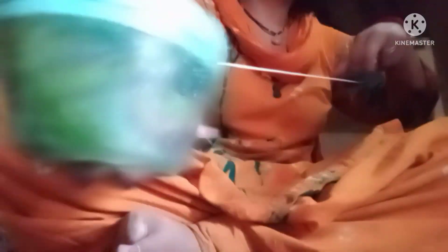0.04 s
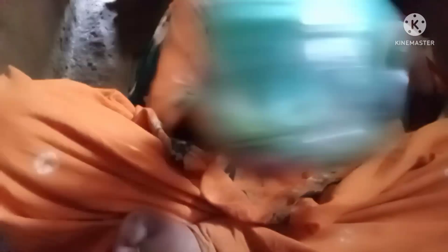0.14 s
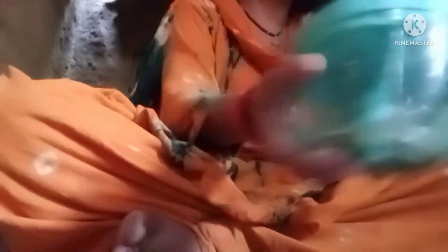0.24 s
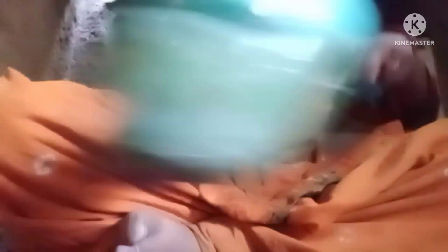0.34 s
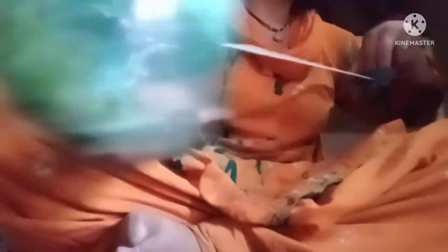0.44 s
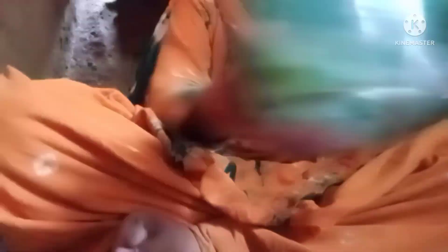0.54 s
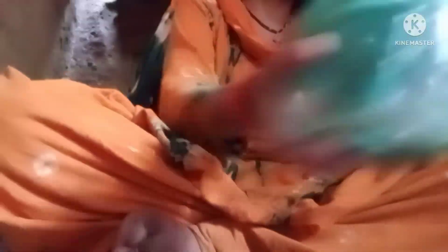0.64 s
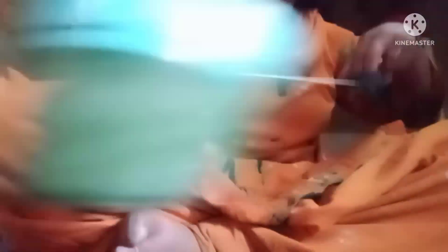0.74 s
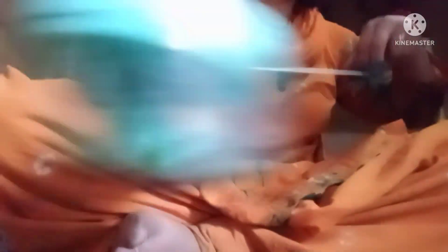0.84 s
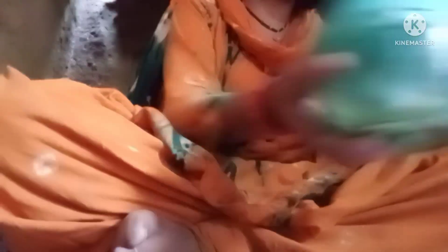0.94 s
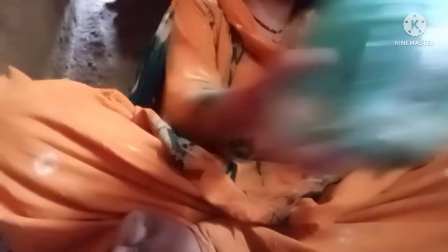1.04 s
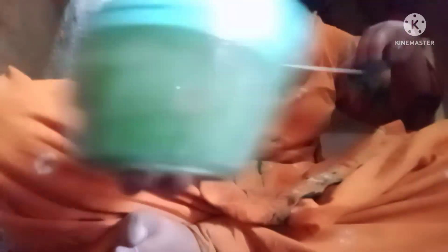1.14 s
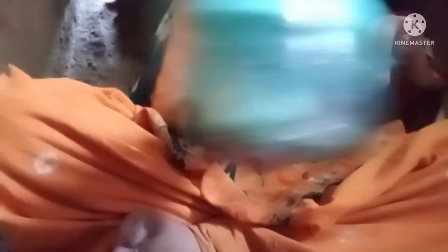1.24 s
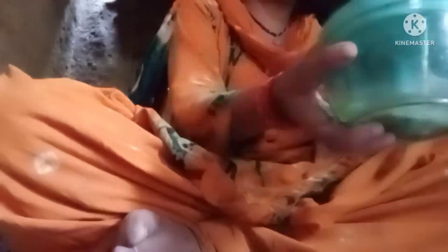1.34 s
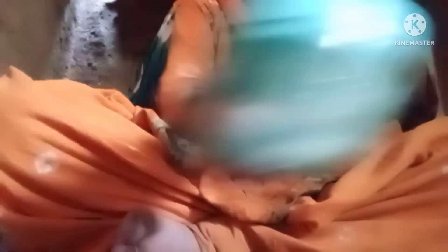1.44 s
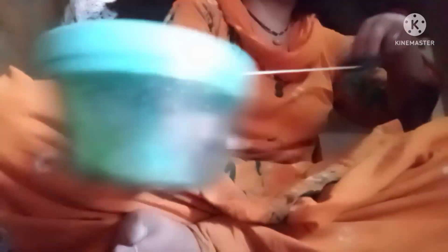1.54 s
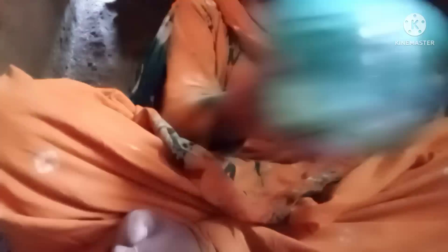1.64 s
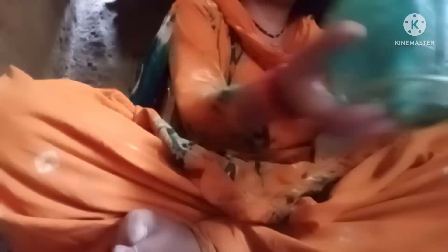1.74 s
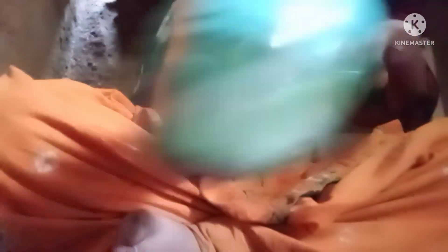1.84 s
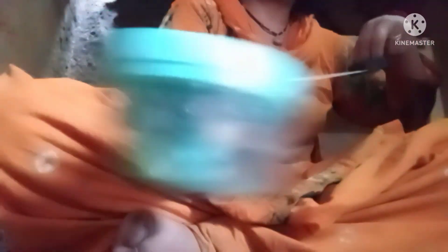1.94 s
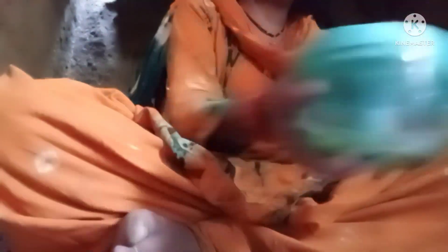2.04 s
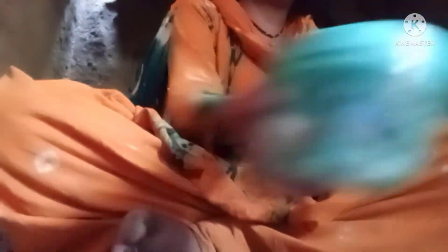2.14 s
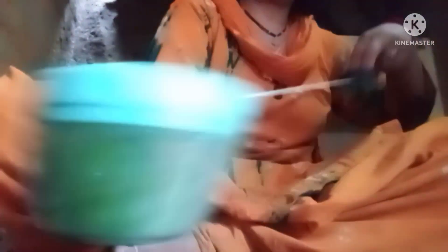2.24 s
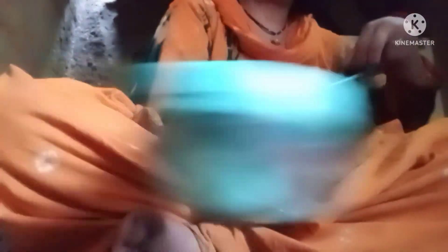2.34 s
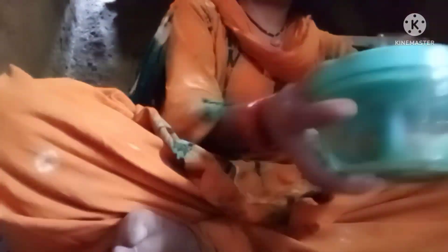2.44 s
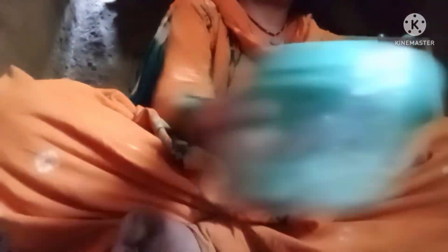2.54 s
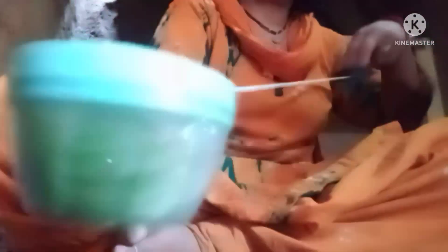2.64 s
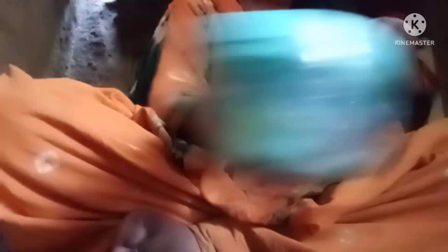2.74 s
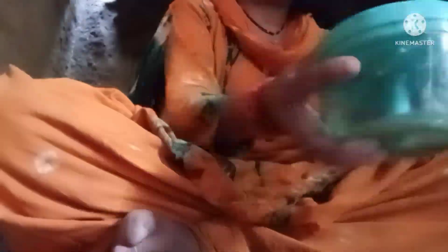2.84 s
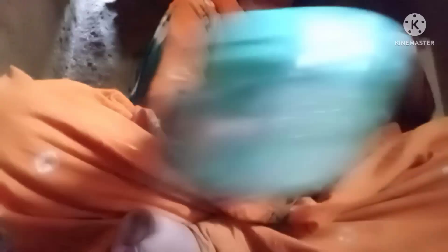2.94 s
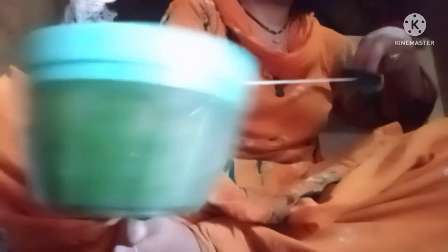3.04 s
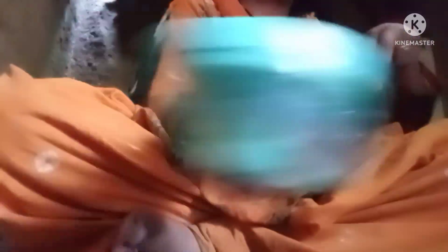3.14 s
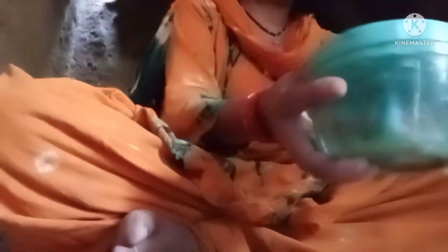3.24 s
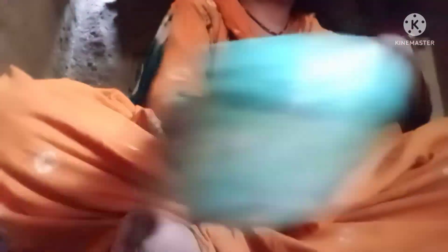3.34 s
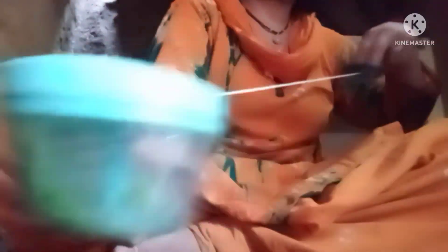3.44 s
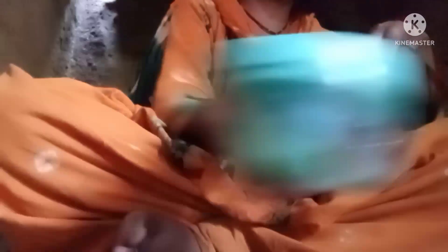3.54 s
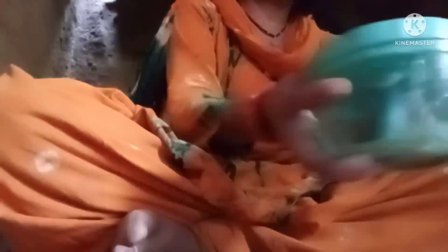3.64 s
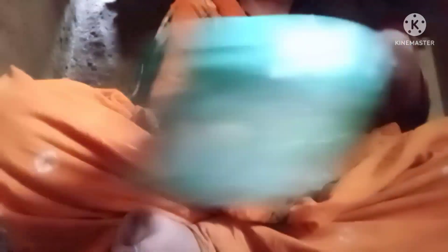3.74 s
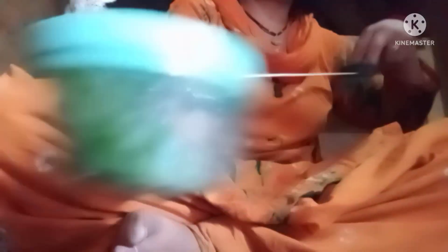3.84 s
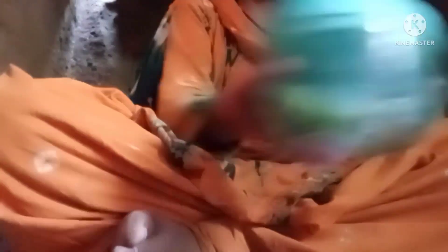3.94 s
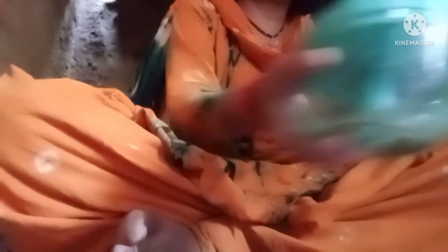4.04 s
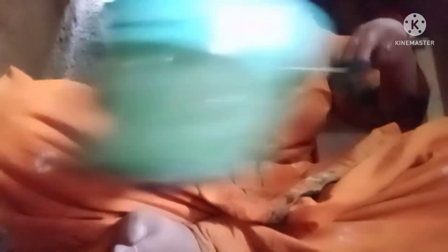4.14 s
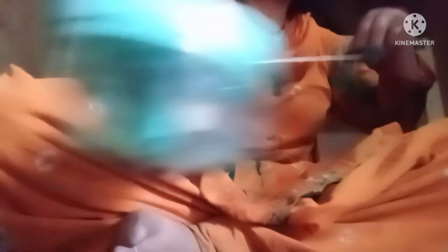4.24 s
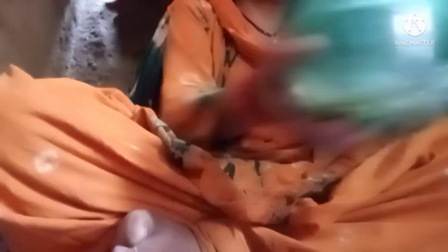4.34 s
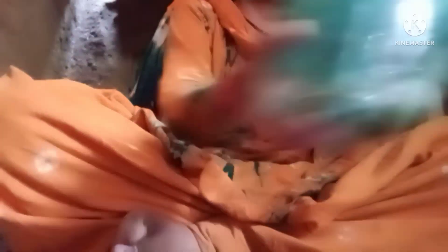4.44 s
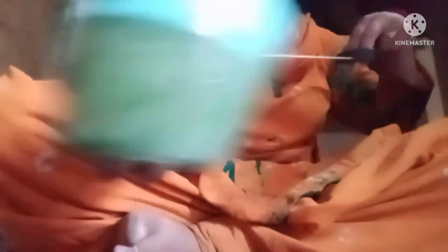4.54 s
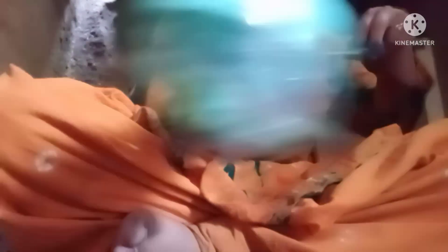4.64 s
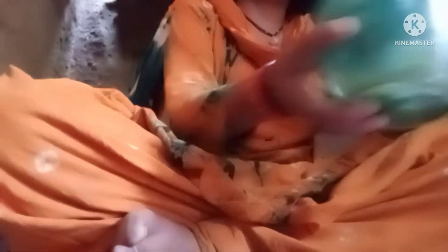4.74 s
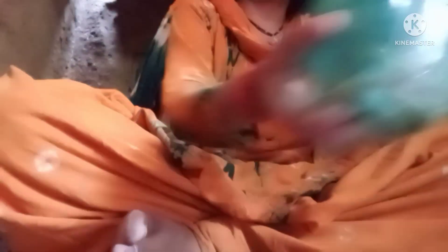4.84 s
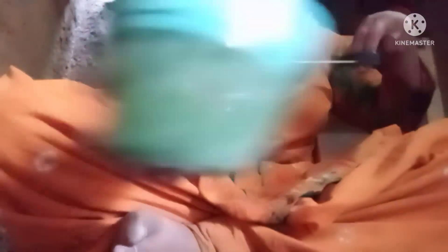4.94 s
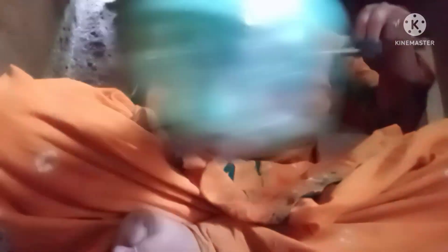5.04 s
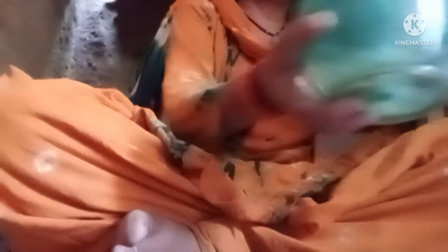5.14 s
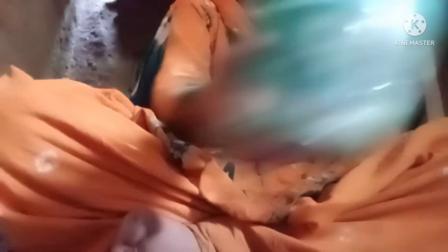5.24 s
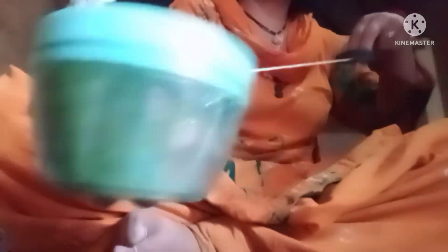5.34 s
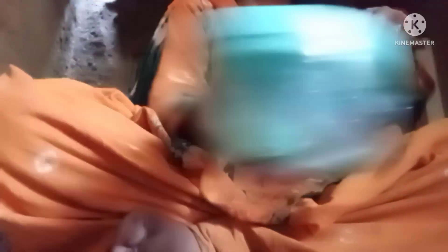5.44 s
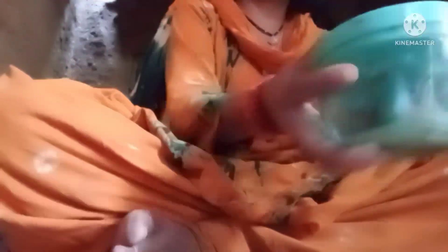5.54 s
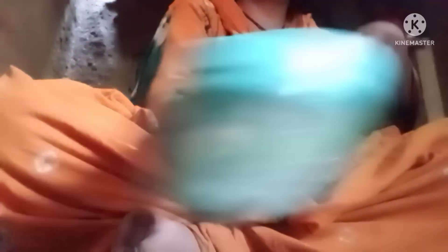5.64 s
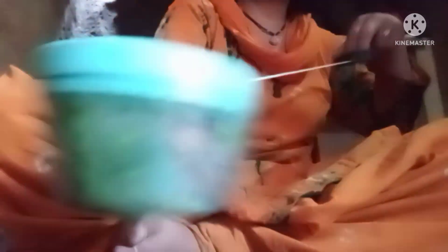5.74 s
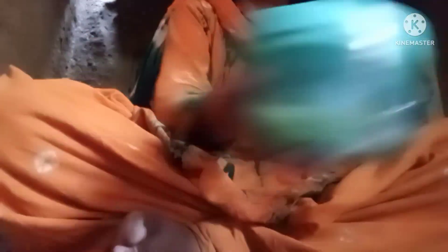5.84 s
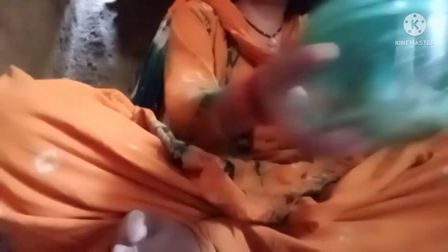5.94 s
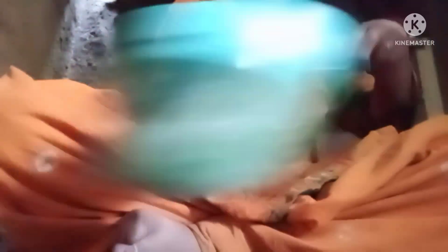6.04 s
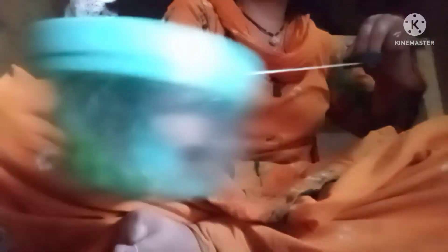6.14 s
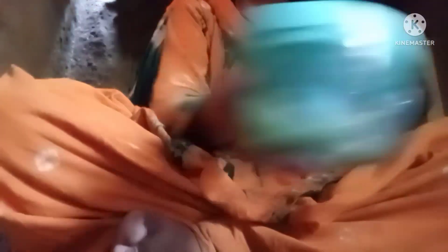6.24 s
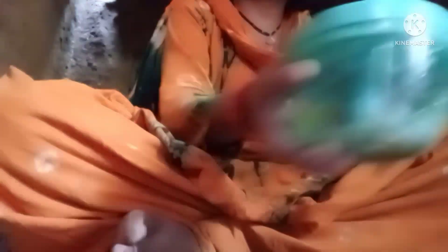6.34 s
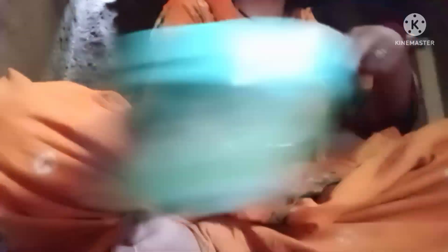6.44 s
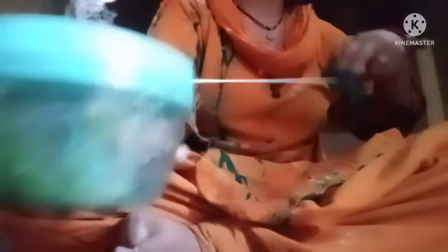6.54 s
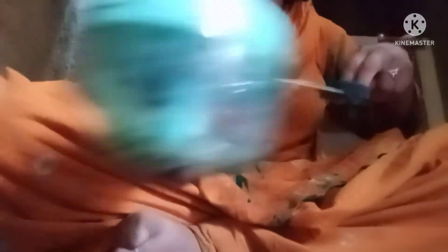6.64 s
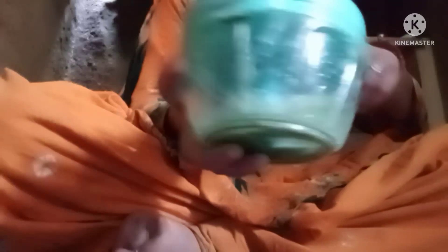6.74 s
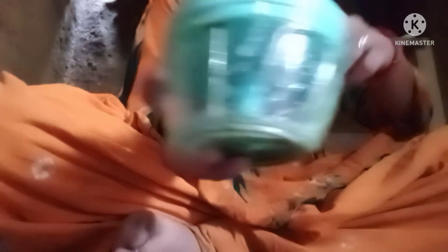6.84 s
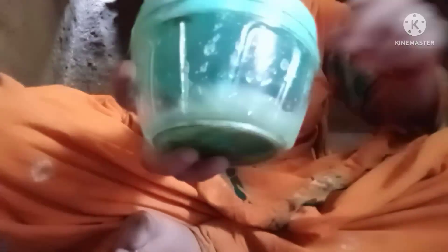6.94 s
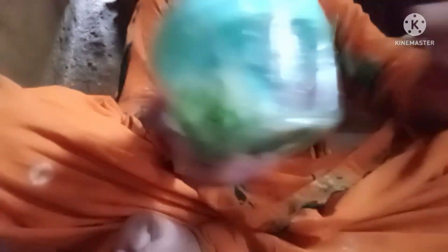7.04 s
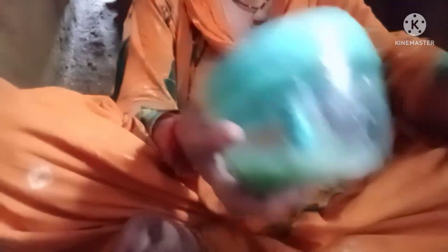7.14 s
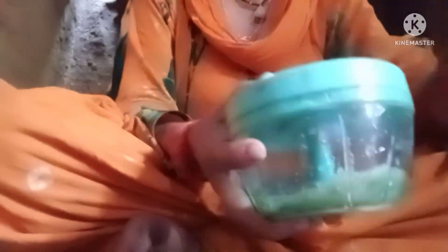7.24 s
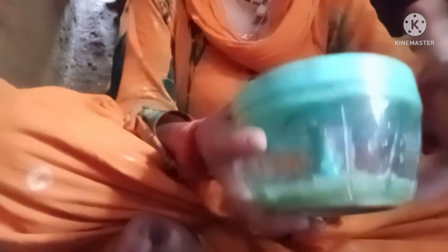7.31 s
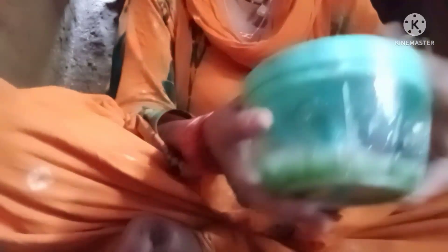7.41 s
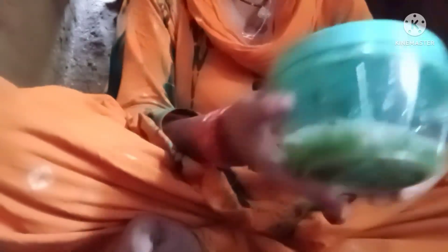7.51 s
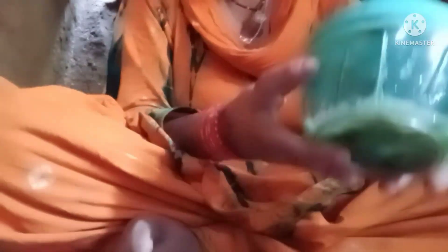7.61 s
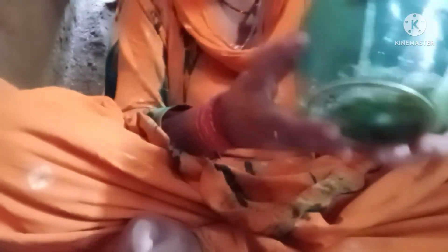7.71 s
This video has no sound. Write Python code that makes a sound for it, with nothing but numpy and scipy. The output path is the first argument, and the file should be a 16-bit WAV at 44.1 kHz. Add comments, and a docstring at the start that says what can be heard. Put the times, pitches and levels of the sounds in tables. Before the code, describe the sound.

From 0 to about 6.7 seconds a hand-pull chopper works loudly, very close, in a small room. Eighteen pulls come roughly every 0.38 seconds. Each lasts about 0.2 seconds: a gritty, bright cord hiss with a midrange whirr of blades ticking through wet leaves, swelling early and fading. At release a hollow shaft knock is followed within hundredths of a second by a sharp pawl catch and skipping clicks, then a rattling ratchet rewind with wet slosh. Leaf clumps thud irregularly against the plastic wall, and the hollow jar tone keeps wavering. Handle clacks hit the lid near 2.7, 4.65 and 6.2 seconds. The last pull is slower, and around 6.64 to 6.76 seconds the handle lands in a quick run of plastic clacks. Short reflections die away; only faint room air remains, with a very soft, dull hand bump near 7.6 seconds.

```python
"""Pull-cord chopper, close up

A hand-held chopper is pulled eighteen times in a small room, close to the microphone. On each pull the cord
hisses (gritty pulse train) and blades whirr through wet leaves (ticks and noise in a drifting resonance).
At releases the shaft knocks, the pawl catches and skips (filtered taps), and the ratchet clatters on rewind.
The handle clacks on the lid (cracks and decaying modes), and at the end it clacks home.
Sparse near reflections, a soft bump in the hand and faint room air (filtered noise) lie behind."""
import sys
import numpy as np
from scipy import signal
from scipy.fft import rfft, irfft
from scipy.io import wavfile
from scipy.ndimage import uniform_filter1d, minimum_filter1d

SR = 44100
rng = np.random.default_rng(int(sys.argv[2]) if len(sys.argv) > 2 else 0)


def wav_out(sig):
    """Save sig, one row per channel (or a flat mono array), as 16-bit PCM at SR to the path in sys.argv[1]."""
    wavfile.write(sys.argv[1], SR, np.round(np.clip(np.atleast_2d(sig).T, -1, 1) * 32767).astype(np.int16))


N = 342831
T = np.arange(N) / SR  # t/s

# Strokes: [release t/s, release knock level/dB, length of the pull before it t/s, wait until the pawl catches t/s,
# catch level/dB, share of crack in the pawl level/dB, rewind clatter level/dB]; levels before the layer offsets
STROKES = [(0.1219, -13, .183, 0.024, -8, -15, -15.5), (0.5082, -13, .195, 0.031, -8, -17.5, -16),
           (0.8879, -11.5, .19, 0.027, -8, -11, -19), (1.26, -15.5, .179, 0.029, -8.5, -11.5, -16),
           (1.6381, -9, .194, 0.026, -12.5, -8, -16.5), (2.0150, -11.5, .193, 0.029, -8.5, -10, -16),
           (2.392, -26.5, .189, .0363, -11, -8, -15.5), (2.7755, -11.5, .198, 0.041, -14, -7, -15),
           (3.1494, -9.5, .191, 0.039, -13, -9, -15), (3.5438, -10.5, .203, .0247, -7.5, -11, -18),
           (3.9215, -8.5, .191, 0.026, -9, -8.5, -16.5), (4.3039, -10, .186, .0263, -5.5, -8.5, -16.5),
           (4.690, -24.5, .199, .039, -21, -8, -14), (5.063, -17, .187, .0315, -8.5, -16, -16.5),
           (5.4377, -9, .18, .0215, -10.5, -14.5, -16.5), (5.821, -22.5, .189, .0456, -19, -14.5, -16),
           (6.2326, -14.5, .211, .0340, -11.5, -11, -19)]
# The last pull, slower, after which the handle is let go: [end t/s, length t/s]
LAST_PULL = (6.68, .228)
# Course of a pull: [share of its length, whirr relative level/dB, cord hiss relative level/dB]
PULL_COURSE = [(-.06, -24, -33.5), (0, -10.5, -13), (.1, -5, -2.5), (.3, 1, 2), (.44, -1, 1),
               (.58, -3.5, -4), (.77, -10, -15.5), (1, -32, -27)]
# Course of a rewind: [share of its length, clatter relative level/dB]
REWIND_COURSE = [(-.03, 4), (0, -3.5), (.08, -8.5), (.2, -0.5), (.37, 3.5), (.58, 0), (.74, 0),
                 (.87, -25.5), (1, -20)]
# Clumps of leaves slammed against the wall: [t/s, level/dB before the body and crack offsets, share of crack level/dB]
THUDS = [(.1883, -7.5, -9), (.3768, -7, -15), (.5926, -8.5, -11), (.6657, -11.5, -15), (1.1269, -14, -29),
         (1.495, -11, -15), (2.4681, -8, -14.5), (2.634, -7.5, -17.5), (2.9294, -10.5, -28),
         (3.0821, -10.5, -21), (3.4006, -7.5, -19.5), (3.8428, -9.5, -15), (4.03, -3, -22),
         (4.4214, -11.5, -25.5), (5.0315, -14, -20), (5.2091, -6.5, -16.5), (5.5149, -13, -17.5),
         (5.911, -9, -18.5), (6.0782, -6, -20), (6.3188, -10, -17.5)]
# The handle strikes the lid: [t/s, level/dB before the crack and ring offsets]
HANDLE_STRIKES = [(2.729, -14.5), (4.6476, -13), (5.819, -27), (6.1842, -9.5), (6.6416, -8.5),
                  (6.6637, -14.5), (6.685, -15), (6.709, -15), (6.755, -15)]

# Colours of the jar under blades, ratchet and hard blows: [f/Hz, relative level per Hz/dB]
WHIRR_COLOUR = [(30, -46.5), (70, -20.5), (150, -8), (300, -4.5), (600, -1.5), (950, -1.5), (1300, -5),
                (1700, -10.5), (2300, -14), (3200, -14), (3800, -27), (4400, -36.5), (5200, -51.5),
                (15000, -69.5)]
CLATTER_COLOUR = [(30, -42), (60, -24.5), (100, -15.5), (160, -4), (300, -2), (800, 0), (1150, -3.5),
                  (1700, -11.5), (2500, -21), (3300, -19), (4000, -37), (4800, -54.5), (11000, -49.5),
                  (15500, -63.5)]
KNOCK_COLOUR = [(50, -31.5), (150, -16), (400, -0.5), (900, 3.5), (1500, -7.5), (2500, -9.5), (3400, -17.5),
                (4100, -26), (4900, -52.5), (8500, -50), (12000, -49.5), (15500, -64.5)]
# Colour of the cord in its eyelet: [f/Hz, relative level per Hz/dB]
CORD_COLOUR = [(2500, -34.5), (4200, -4), (5200, -8.5), (6600, -7.5), (7800, 2), (9000, 3), (10000, -5.5),
               (11200, 2), (12400, 0.5), (13400, -12), (14500, -11.5), (15700, -8.5)]
# Resonances of jar and lid: [f/Hz, width f/Hz, lift level/dB]
JAR_RESONANCES = [(264, 25, 6.5), (401.3, 101, 8), (695, 55, 1), (826, 50, 4), (1980, 100, 5),
                  (2785, 74, 3.5)]
# Colour of handle and lid: [f/Hz, relative level per Hz/dB]
HANDLE_COLOUR = [(50, -29.5), (150, -16.5), (400, -1.5), (750, 0), (1100, 3.5), (1600, -5), (2400, -7),
                 (3050, -8), (3550, -6.5), (4100, -22), (4900, -41.5), (8500, -36.5), (12000, -40),
                 (15500, -52)]
# Modes of the lid: [f/Hz, relative level/dB, t60 t/s]
LID_MODES = [(1060, -7.5, 0.076), (1120, -9.5, 0.072), (1960, -10, .08), (2120, -8.5, 0.13),
             (2780, -17.5, .07), (3500, -13, .08), (3870, -20.5, 0.1)]
# Decay of the small room: [f/Hz, t60 t/s]
ROOM_DECAY = [(150, 0.76), (400, 0.31), (1000, .24), (2800, .27), (8000, 0.33)]
# Quiet air of the room: [f/Hz, relative level per Hz/dB]
AIR_COLOUR = [(24, -48), (50, -17.5), (135, -4), (250, -1.5), (330, -4.5), (440, -4), (900, -6),
              (2300, -17), (3300, -17), (4000, -26), (5000, -37), (9000, -36.5), (12000, -35.5),
              (15500, -37.5)]
# The faint background swells and sinks: [t/s, relative level/dB]
AIR_SWELL = [(6.9, 0), (7.3, -0.5), (7.42, 1), (7.47, 0), (7.53, -7), (7.59, 0.5), (7.75, 1)]

PULL_S, PULL_DB = 0.19, -20.5  # length and base level of an ordinary pull
HASTE_DB = 12  # a pull in half the time is this much louder
HISS_FOLLOWS = 0.49  # share of the effort in dB that the cord hiss follows
SKIP_S, SKIP_FADE_DB, SKIP_COUNT = .0122, -2.5, 3  # after the catch the pawl hits tooth after tooth
RELEASE_TREBLE_DB = -11  # share of crack in the knock of the shaft
REBOUND_S, REBOUND_DB = 0.0092, -11.5  # after each strike the handle drops back once
BUMP_S, BUMP_DB = 7.587, -53.5  # the jar shifts in the hand
AIR_DB = -64  # before the swell
EDGE_HZ = 15800  # upper band limit


def stroke_gains():
    """Gains of whirr, hiss and clatter: quicker pulls are louder; each rewind lasts until the next pull."""
    whirr, cord, clatter = np.zeros((3, N))
    pull, rewind = np.transpose(PULL_COURSE), np.transpose(REWIND_COURSE)
    pulls = [(release, length) for release, _, length, *_ in STROKES] + [LAST_PULL]
    for release, length in pulls:
        progress = 1 + (T - release) / length
        on = (progress > pull[0, 0]) & (progress < 1)
        effort_db = PULL_DB + HASTE_DB * np.log2(PULL_S / length)
        whirr[on] = amp(effort_db + np.interp(progress[on], pull[0], pull[1]))
        cord[on] = amp(HISS_FOLLOWS * effort_db + np.interp(progress[on], pull[0], pull[2]))
    for (release, *_, rewind_db), (next_release, next_length) in zip(STROKES, pulls[1:]):
        next_start = next_release - next_length
        progress = (T - release) / (next_start - release)
        on = (progress > rewind[0, 0]) & (progress < 1)
        clatter[on] = amp(rewind_db + np.interp(progress[on], rewind[0], rewind[1]))
    return uniform_filter1d([whirr, cord, clatter], size=200)


def blades(gain):
    """Gear teeth and blades tick against leaf pieces, faster where the pull is louder, over a wash of water."""
    speed = abs(gain / gain.max()) ** .3
    ticks = chatter(teeth(per_s=260 * speed, jitter=.3, spread_db=2.5), skid_s=0.0047, skid=1.5)
    turns = np.cumsum(58 * speed) / SR
    passes = 1 + 0.37 * np.sin(2 * np.pi * turns)  # each turn drags the blades through the pile
    water = rng.standard_normal(N)
    drive = gain * passes * (amp(-3) * ticks + amp(-1.5) * water)
    return swirl(through(drive, wall(WHIRR_COLOUR)), hz=1029, width_hz=42, wander=0.18, share=1.0)


def cord_hiss(gain):
    """The braided cord rasps through the eyelet, strand after strand."""
    strands = teeth(per_s=700, jitter=.5, spread_db=3)
    rasp = chatter(strands, skid_s=.003, skid=3)
    return amp(-39.0) * through(gain * rasp, ring(CORD_COLOUR))


def ratchet(gain):
    """The pawl skips over its teeth while the spring rewinds and the wet leaves slosh."""
    skips = chatter(teeth(per_s=95, jitter=.22, spread_db=2.5), skid_s=0.0058, skid=1.82)
    slosh = chatter(teeth(per_s=420, jitter=.7, spread_db=2.0), skid_s=.0028, skid=1.4)
    drive = gain * (amp(-3) * skips + amp(-5.5) * slosh)
    return swirl(through(drive, wall(CLATTER_COLOUR)), hz=735, width_hz=62, wander=.25, share=0.85)


def scraps(gain, level_db=-12, dull_hz=2200):
    """Smaller bits of stalk hit the wall at random whenever the blades move."""
    hits = chatter(teeth(per_s=30, jitter=.6, spread_db=3.5), skid_s=0.0019, skid=.5)
    in_jar = through(gain * hits, wall(KNOCK_COLOUR))
    return amp(level_db) * signal.lfilter(*signal.butter(1, dull_hz, fs=SR), in_jar)


def knocks(split_hz=1600, body_db=-2.5, crack_db=-2.0):
    """Hard blows: a hollow body tone and a plastic crack, in shares that depend on where they land."""
    out, h = np.zeros(N), wall(KNOCK_COLOUR)
    low = signal.butter(3, split_hz, "low", fs=SR, output="sos")
    high = signal.butter(3, split_hz, "high", fs=SR, output="sos")
    for s, db, treble_db in blows():
        blow = strike(h, skid_s=0.0026, skid=0.2)
        add(out, s, at_level(signal.sosfilt(low, blow), db + body_db))
        add(out, s, at_level(signal.sosfilt(high, blow), db + treble_db + crack_db))
    return out


def blows(uneven_s=.0005, uneven_db=2.0):
    """Blows as (t/s, level/dB, crack share/dB): clumps thud, the shaft knocks, the pawl catches and skips."""
    rows = list(THUDS)
    for release, knock_db, _, wait, catch_db, crack_db, _ in STROKES:
        catch = release + wait
        rows += [(release, knock_db, RELEASE_TREBLE_DB), (catch, catch_db, crack_db)]
        for k, (late, hard) in enumerate(rng.standard_normal((SKIP_COUNT, 2)), 1):
            skip = catch + k * SKIP_S + uneven_s * late
            skip_db = catch_db + k * SKIP_FADE_DB + uneven_db * hard
            rows.append((skip, skip_db, crack_db))
    return rows


def clacks(ring_db=-7, crack_db=-1):
    """The handle cracks on the lid and rebounds; each hit wakes the lid's modes differently."""
    out, h = np.zeros(N), ring(HANDLE_COLOUR)
    t = T[:len(h)]
    rebounds = [(s + REBOUND_S, db + REBOUND_DB) for s, db in HANDLE_STRIKES]
    for s, db in HANDLE_STRIKES + rebounds:
        modes = np.zeros(len(t))
        for hz, mode_db, t60 in LID_MODES:
            decay = amp(mode_db - 60 * t / t60)
            modes += rng.uniform(-1, 1) * decay * np.sin(2 * np.pi * hz * t)
        crack = at_level(strike(h, skid_s=0.0033, skid=0.36), db + crack_db)
        add(out, s, crack + amp(db + ring_db) * modes)
    return out


def handling(decay_s=.014):
    """A soft bump of the palm on the jar: a decaying noise push, dulled."""
    out, t = np.zeros(N), T[:SR // 8]
    push = rng.standard_normal(len(t)) * np.exp(-t / decay_s)
    colour = [(40, -26), (140, 3.0), (400, -12.0), (1500, -27), (5000, -48)]  # f/Hz, relative level per Hz/dB
    add(out, BUMP_S, amp(BUMP_DB) * through(push, ring(colour)))
    return out


def room(x, delay_s=.004):
    """Sparse reflections from near walls, each band dying at its own speed."""
    count, spacing = 900, 22  # reflections, samples
    taps = np.zeros(SR // 2)
    at = round(delay_s * SR) + np.arange(count) * spacing + rng.integers(0, spacing, count)
    taps[at] = rng.choice([-1., 1.], count)
    hz, t, bands = signal.stft(taps, SR, nperseg=256)
    decay = amp(-60 * t / read(ROOM_DECAY, hz)[:, None])
    tail = signal.istft(bands * decay, SR, nperseg=256)[1]
    return through(x, tail / np.linalg.norm(tail))


def room_air():
    """Quiet room air: coloured steady noise under a slow level curve."""
    swell_db = np.interp(T, *np.transpose(AIR_SWELL))
    return amp(AIR_DB + swell_db) * through(rng.standard_normal(N), ring(AIR_COLOUR))


def teeth(per_s, jitter, spread_db):
    """A train of blows at uneven intervals and of uneven strength; per_s may be a curve."""
    gap, size = rng.standard_normal((8000, 2)).T
    expected_count = np.cumsum(per_s * np.ones(N)) / SR
    at = np.searchsorted(expected_count, np.cumsum(np.exp(jitter * gap)))
    out = np.zeros(N)
    out[at[at < N]] = amp(spread_db * np.clip(size, -2, 1))[at < N]
    return out


def chatter(blows, skid_s, skid):
    """Each blow is a sharp tap followed by a short gritty skid."""
    r = np.exp(-1 / (skid_s * SR))
    grit = signal.lfilter([1], [1, -r], blows) * rng.standard_normal(N)
    taps = blows * rng.choice([-1, 1], N)
    return unit(unit(taps) + skid * unit(grit))


def strike(h, skid_s, skid):
    """One hard contact, a tap and its skid, played through the response h."""
    t = T[:len(h)]
    force = skid * rng.standard_normal(len(t)) * np.exp(-t / skid_s)
    force[0] += 1
    return through(force, h) * rng.choice([-1, 1])


def swirl(x, hz, width_hz, wander, share):
    """The air pocket over the whirling water resonates at a pitch that keeps changing."""
    rates = np.geomspace(1.5, 11, 12)  # f/Hz
    drift = unit(sum(np.sin(2 * np.pi * (f * T + rng.random())) for f in rates))
    turn = np.exp(2j * np.pi * np.cumsum(hz * np.exp(wander * drift)) / SR)
    r = np.exp(-np.pi * width_hz / SR)
    # shift the moving pitch to zero, low-pass, shift back
    pocket = (turn * signal.lfilter([1 - r], [1, -r], x / turn)).real
    return (x + 2 * share * pocket) / np.sqrt(1 + share / 2)


def wall(colour):
    """Response of the plastic jar to one tap, smeared by bending waves."""
    return bend(bend(ring(colour, JAR_RESONANCES), 850, 700), 2400, 1300)


def bend(x, hz, width_hz):
    """Bending waves travel at different speeds and smear each tap into a few swings (an all-pass)."""
    r = np.exp(-np.pi * width_hz / SR)
    poles = np.array([1, -2 * r * np.cos(2 * np.pi * hz / SR), r * r])
    return signal.lfilter(poles[::-1], poles, x)


def ring(colour, modes=(), size=8192):
    """Causal response to one tap, of energy one, from a colour and its resonances."""
    hz = np.fft.rfftfreq(size, 1 / SR)
    db = read(colour, hz) + sum(lift / (1 + (2 * (hz - f) / width) ** 2) for f, width, lift in modes)
    # folding the cepstrum gives minimum phase
    cepstrum = irfft(np.log(amp(db)))
    cepstrum[1:size // 2] *= 2
    cepstrum[size // 2 + 1:] = 0
    h = irfft(np.exp(rfft(cepstrum)))[:size // 2]
    return h / np.linalg.norm(h)


def through(x, h):
    """Plays x through the response h."""
    return signal.oaconvolve(x, h)[:len(x)]


def read(points, hz):
    """Reads a curve on a log-frequency axis."""
    f, value = np.transpose(points)
    return np.interp(np.log(hz + 1), np.log(f + 1), value)


def amp(db):
    """Decibels to gain."""
    return 10 ** (np.asarray(db) / 20)


def unit(x):
    """Scales to an rms of one."""
    return x / np.sqrt(np.mean(x ** 2) + 1e-20)


def at_level(sound, db):
    """Sets the level of a hit's first three milliseconds."""
    return amp(db) * sound / sound[:round(.003 * SR)].std()


def add(mix, s, sound):
    """Mixes a sound in at time s."""
    part = mix[round(s * SR):][:len(sound)]
    part += sound[:len(part)]


def scene():
    """The chopper close up, its room reflections, the bump and the quiet air."""
    whirr, cord, clatter = stroke_gains()
    chopper = blades(whirr) + cord_hiss(cord) + ratchet(clatter)
    chopper += scraps(whirr + clatter) + knocks() + clacks()
    return (chopper + amp(-9.5) * room(chopper) + handling() + room_air())[None]


def record(dry):
    """A limiter eases down the loudest peaks; then the band limit."""
    ceiling = .85
    gain = np.minimum(1, ceiling / (abs(dry) + 1e-9))
    gain = minimum_filter1d(gain, size=161)
    gain = uniform_filter1d(uniform_filter1d(gain, size=81), size=81)
    band = signal.firwin(511, EDGE_HZ, window=("kaiser", 9), fs=SR)
    return signal.oaconvolve(dry * gain, band[None], "same")


dry = scene()
out = record(dry)
wav_out(out)
```